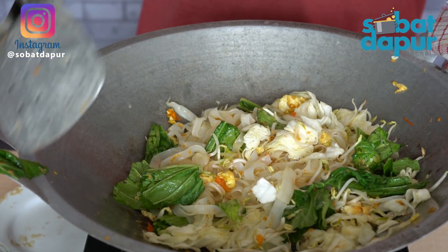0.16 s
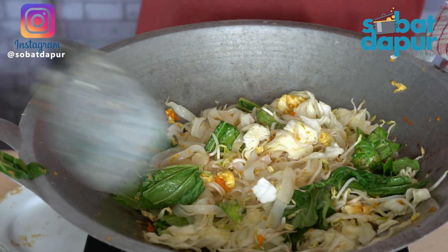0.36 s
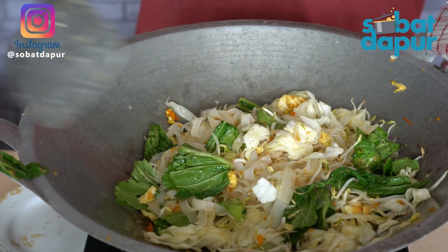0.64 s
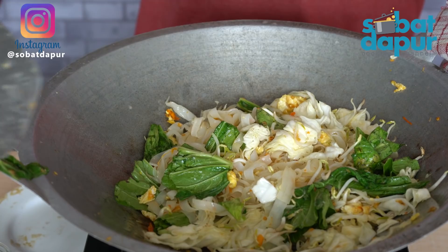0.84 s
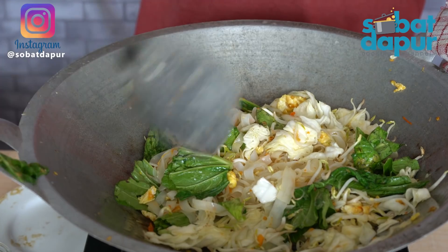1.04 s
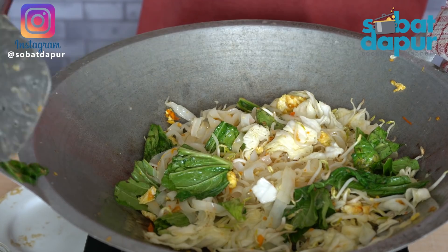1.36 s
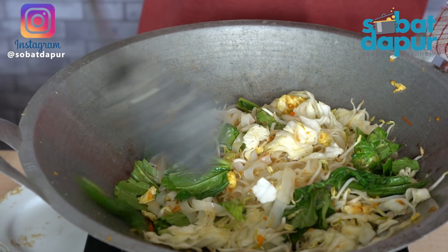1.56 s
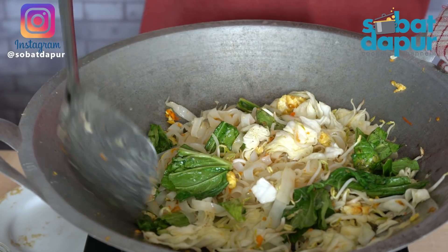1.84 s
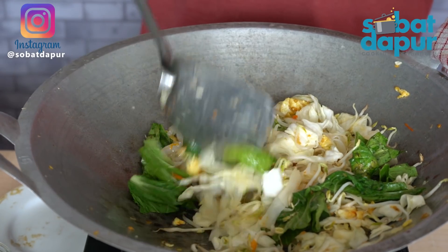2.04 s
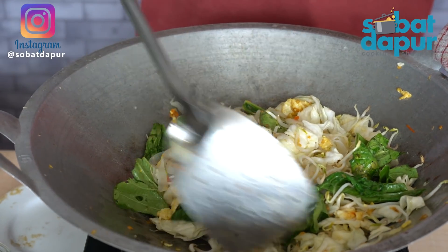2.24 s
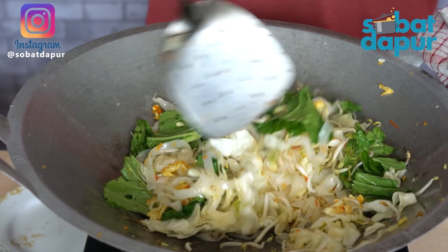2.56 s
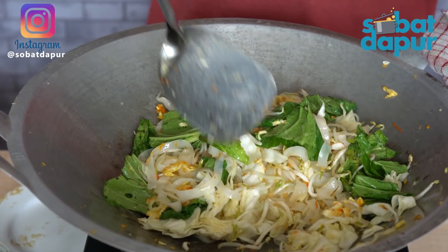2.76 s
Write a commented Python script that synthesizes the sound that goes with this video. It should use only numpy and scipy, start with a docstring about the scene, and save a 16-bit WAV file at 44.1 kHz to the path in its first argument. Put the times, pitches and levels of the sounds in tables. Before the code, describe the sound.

A metal spatula strikes a steel wok six times, about every half second, with a quick scrape before the loudest fourth clank; oil sizzles and pops over a low burner roar, close in a small kitchen.

```python
"""A metal spatula knocks six times against a steel wok and drags once along it: noise cracks, decaying
sines for thud, blade and bowl, and random slips exciting the same modes. A short ping precedes the last
blow, and food then slides off the blade as grainy noise. Oil sizzles as hiss, tiny sine bursts and single
pops over the filtered-noise roar of a gas burner. A small kitchen adds a diffuse tail to the metal and the
sliding food. The camera's gain control steps down at loud blows and creeps back."""
import sys
import numpy as np
from scipy import signal
from scipy.io import wavfile
from scipy.ndimage import uniform_filter1d

SR = 44100
rng = np.random.default_rng(int(sys.argv[2]) if len(sys.argv) > 2 else 0)


def unload_audio(sound):
    """Save the sound as a 16-bit wav file, at the path given as the first command line argument."""
    columns = np.transpose(np.atleast_2d(sound))
    # keep every value between -1 and 1, then stretch to whole-number steps
    steps = np.round(np.clip(columns, -1, 1) * 32767)
    wavfile.write(sys.argv[1], SR, steps.astype(np.int16))


N = 127890

# Spectrum of the burner roar: (frequency [Hz], relative level [dB])
FLAME_SPECTRUM = [(15, -21), (25, -48), (65, 2), (168, -4), (204, -0.5), (284, -8), (389, -8.5),
                  (425, -15.5), (509, -12.5), (557, -19.5), (900, -23), (1170, -42), (1980, -120)]
# Slow course of the roar: (time [s], level [dB])
FLAME_LEVEL = [(0, 1), (.3, 2.5), (.6, 3), (.9, 0.5), (1.3, -1), (1.7, -4), (2.1, 2.5), (2.4, -1), (2.6, 6),
               (2.9, 2.5)]
# Spectrum of the steady frying hiss: (frequency [Hz], relative level [dB])
HISS_SPECTRUM = [(290, -25.5), (500, -13.5), (562, -23.5), (960, -5), (1530, -4.5), (2070, -4.5), (3340, 4),
                 (3920, -3), (6900, -13.5), (12700, -13), (16000, -29)]
# Spectrum that filters the rain of tiny oil bursts: (frequency [Hz], relative level [dB])
CRACKLE_SPECTRUM = [(410, -50), (700, -17), (997, -15), (1540, -5), (2130, -7), (3320, 0.5), (4050, -6.5),
                    (6830, -6.5), (12800, -11), (16000, -8.5)]
# Level of hiss and crackle together: (time [s], level [dB])
FRYING_LEVEL = [(0, -2.5), (.3, 0), (.6, 0.5), (.85, 1), (1.1, -1), (1.4, -1), (1.7, -10.5), (2, -3.5),
                (2.3, -4), (2.6, -1.5), (2.9, -2.5)]
# Loudest pops of oil, each with a short ring after: (time [s], snap level [dB], ring level [dB])
POPS = [(0.082, -22, -31), (0.0882, -20.0, -39), (0.1365, -23, -41), (0.1437, -16, -22), (0.1508, -15, -24),
        (0.2243, -17, -30), (0.2348, -10.0, -30), (0.2477, -5.5, -19), (0.2525, -16.0, -20.5),
        (0.297, -18, -33), (0.3146, -11.5, -26), (0.4039, -18.0, -14.5), (0.413, -19.5, -34.5),
        (0.4155, -21, -27.5), (0.638, -18, -38), (0.6791, -23, -31), (0.699, -17, -37),
        (0.7868, -16.5, -19.5), (0.8996, -13, -26.5), (1.0235, -51, -10), (1.2369, -13.5, -19),
        (1.2558, -21, -28), (1.276, -36, -32.0), (1.2777, -18, -33), (1.3095, -17.5, -21),
        (1.3134, -15.5, -16.5), (1.3763, -14, -28), (2.143, -38, -16), (2.4783, -21.5, -17),
        (2.5438, -27, -19), (2.5647, -31, -17.5), (2.6361, -19.5, -23), (2.7688, -21, -18.5),
        (2.7832, -26, -25.5), (2.7863, -18, -25), (2.7933, -35, -12)]
# Reverberation of the kitchen: (frequency [Hz], decay time T60 [s])
ROOM_T60 = [(200, 0.43), (1000, 0.62), (3000, 0.67), (6000, 0.63), (12000, 0.36)]
# Spectrum of the sliding food: (frequency [Hz], relative level [dB])
SHOVE_SPECTRUM = [(150, -25), (300, -3), (500, 5), (700, -4), (1000, -10), (1400, -25), (4000, -38)]
# Long modes of the wok: (frequency [Hz], decay time T60 [s])
WOK_MODES = [(350, 0.43), (463, 0.5), (618, 0.54), (721, 0.48), (829, 0.58), (958, 0.69), (1330, 0.61),
             (1593, 0.42), (1755, 0.63), (2137, 0.6), (2279, 0.48), (2522, 0.5), (2923, 0.48), (3262, 0.72),
             (3418, 0.38), (3612, 0.55), (4760, 0.4)]
# Each blow lands on another spot and stirs the modes differently: one row a blow, one level [dB] a wok mode
STIRRED_DB = [(-24, -25, -38, -25, -27, -26, -23, -31, -23, -42, -27, -33, -31, -36, -29, -36, -40),
              (-32, -23, -36, -25, -34, -26, -35, -32, -24, -43, -31, -29, -25, -42, -34, -43, -48),
              (-26, -27, -44, -27, -44, -30, -31, -33, -32, -30, -21, -26, -22, -28, -32, -32, -46),
              (-30, -24, -33, -25, -20, -25, -17, -32, -21, -23, -13, -20, -20, -27, -31, -30, -48),
              (-32, -40, -37, -29, -38, -29, -22, -41, -28, -33, -31, -46, -42, -36, -29, -28, -34),
              (-28, -37, -28, -33, -36, -30, -50, -50, -48, -44, -47, -46, -42, -36, -43, -44, -45)]
# Short modes of the spatula blade: (frequency [Hz], relative level [dB], decay time T60 [s])
BLADE_MODES = [(1156, -18, 0.12), (2055, -3, 0.023), (2725, -1, 0.059), (2855, 0.5, 0.035),
               (3343, -2.5, 0.04), (3680, -9, 0.066), (3970, -14, .06)]
# Blows: (time [s], level of the knock [dB], one colour [dB] for each of COLOUR_HZ,
#         spatula ring [dB], level change per rebound [dB], rebound gap [s])
BLOWS = [(.444, -1.5, 1.5, 4.5, 2, -1, 6, -5, -17.5, -10, -3.5, 0.0059),
         (.937, -1, 0, 2.5, 2.5, 2.5, 2.2, -4, -12, -7, -10.5, 0.0042),
         (1.431, 3, -2, 2.5, 4.5, 6.5, 5.3, -5, -21, -5.5, -9.5, 0.013),
         (1.571, 7.5, -4, 6.5, 6, 7, 7.9, -9, -24, -11, -16, .005),
         (1.961, -3, -3.5, 7, -6.5, -0.5, 13.5, -3, -9, -11, -5.5, 0.0077),
         (2.403, 4, 1.5, 6, -11, -7.5, 5.6, -14, -24.5, -16.5, -10.5, .010)]
# Frequencies at which the colour of a blow is given: [Hz]
COLOUR_HZ = [400, 900, 1900, 2800, 3600, 6000, 11000]
# Decay of the thud, one a blow; food under the blade damps the later ones: (decay time T60 [s])
THUD_T60S = [0.03, .035, 0.026, 0.023, 0.018, 0.015]

# Levels are in dB, decay times T60 in s
FLAME_DB = -38.5
HISS_DB = -39.5
CRACKLE_DB, CRACKLES_PER_S, SPREAD_DB = -37.5, 1700, 4
SNAP_HZ, SNAP_T60, KNOCK_HZ, KNOCK_T60 = 11500, 0.00093, 3250, 0.0055
ROOM_DB, RING_ROOM_DB = -11, -5.5
SHOVE_S, SHOVE_DB, SHOVE_T60, GRIT_PER_S = 2.41, -31.5, 0.6, 400
PING_S, PING_HZ, PING_DB, PING_T60 = 2.376, 1600, -27.5, 0.1
TWIN_SPLIT, TWIN_DB = 0.0048, -9  # split is a fraction of the mode frequency
DRAG_FROM_S, DRAG_TO_S, SLIPS_PER_S = 1.515, 1.568, 2500
DRAG_DB, DRAG_RISE_DB, DRAG_HISS_DB, DRAG_WOK_DB = -17, 11, -6, -9.5
TOUCHES = 4  # first contact and three rebounds
CRACK_T60, THUD_HZ, THUD_DB = 0.027, 417, -1
START_GAIN_DB, LOUD_DB, QUIET_DB = 1.5, -15, -40
FALL_PER_S, CREEP_PER_S = 59, 0.86  # dB per second for each dB beyond the threshold
CEILING, EDGE_HZ = 0.94, 15900  # clipping amplitude, upper band limit


def amp(db):
    """Decibel law: 20 dB is a factor of ten in amplitude."""
    return 10 ** (np.asarray(db) / 20)


def evened(x):
    """Normalisation to unit root-mean-square value."""
    return x / np.sqrt(np.mean(x ** 2) + 1e-20)


def curve(points):
    """Linear interpolation of a table over time."""
    t, value = np.transpose(points)
    return np.interp(np.arange(N) / SR, t, value)


def colour(x, points):
    """Minimum-phase filtering: the Hilbert transform of the log gain gives the causal phase."""
    f, db = np.transpose(points)
    hz = np.abs(np.fft.fftfreq(4096, 1 / SR))
    log_gain = np.interp(np.log(hz + 1), np.log(f), db) * np.log(10) / 20
    response = np.exp(np.conj(signal.hilbert(log_gain)))
    taps = np.fft.ifft(response).real[:2048]
    return signal.oaconvolve(x, taps)[:len(x)]


def add(mix, s, sound):
    """Superposition: a sound is summed into the mix from time s."""
    part = mix[round(s * SR):][:len(sound)]
    part += sound[:len(part)]


def ring(modes, t):
    """Modal synthesis: exponentially decaying sines of random phase."""
    total = 0
    for hz, db, t60 in modes:
        total = total + amp(db - 60 * t / t60) * np.sin(2 * np.pi * (hz * t + rng.random()))
    return total


def slow(rate_hz):
    """Low-passed noise: a slow random wander of rms 1."""
    low_pass = signal.butter(2, rate_hz, fs=SR, output="sos")
    return evened(signal.sosfilt(low_pass, rng.standard_normal(N)))


def kitchen(x):
    """Diffuse reverberation: convolution with noise whose bands each decay at their own rate."""
    hz, t, bands = signal.stft(rng.standard_normal(SR), SR, nperseg=256)
    f, t60 = np.transpose(ROOM_T60)
    decay = amp(-60 * t / np.interp(hz, f, t60)[:, None])
    tail = signal.istft(bands * decay, SR, nperseg=256)[1]
    tail = tail * (np.arange(len(tail)) > 300)  # silent for the first 7 ms
    return signal.fftconvolve(x, tail / np.linalg.norm(tail))[:N]


def flame():
    """Broadband combustion roar: low filtered noise with a fluttering level."""
    level_db = FLAME_DB + curve(FLAME_LEVEL) + 1.2 * slow(40)
    return evened(colour(rng.standard_normal(N), FLAME_SPECTRUM)) * amp(level_db)


def crackle():
    """Shot noise: a random rain of tiny decaying sines of varied pitch and size."""
    happens = rng.random(N) < CRACKLES_PER_S / SR * amp(2.0 * slow(12))
    size = amp(SPREAD_DB * np.minimum(rng.exponential(1, N), 4)) * happens
    kind = rng.integers(0, 16, N)
    t, grains = np.arange(300) / SR, 0
    for k, hz in enumerate(np.geomspace(2000, 15500, num=16)):
        t60 = 0.00066 + 2.7 / hz  # higher bursts die sooner
        grain = amp(-60 * t / t60) * np.sin(2 * np.pi * (hz * t + rng.random()))
        grain = grain / np.linalg.norm(grain) * hz ** 0.3
        grains = grains + signal.oaconvolve(size * (kind == k), grain)[:N]
    return amp(CRACKLE_DB) * evened(colour(grains, CRACKLE_SPECTRUM))


def sizzle():
    """Superposed frying noise: wavering hiss, crackle, and pops of a high snap, each followed by a short ring
    near 3.3 kHz."""
    hiss = evened(colour(rng.standard_normal(N), HISS_SPECTRUM)) * amp(HISS_DB + 3.1 * slow(26))
    out = amp(curve(FRYING_LEVEL)) * (hiss + crackle())
    t = np.arange(300) / SR
    for s, snap_db, knock_db in POPS:
        a, b = rng.uniform(0.9, 1.1, 2)  # pitch scatter
        add(out, s, ring([(a * SNAP_HZ, snap_db, SNAP_T60), (b * KNOCK_HZ, knock_db, KNOCK_T60)], t))
    return out


def shove():
    """Granular friction: food slides off the blade after the last blow, a dull rustle that fades."""
    t, out = np.arange(SR) / SR, np.zeros(N)
    grit = rng.standard_normal(SR) * (rng.random(SR) < GRIT_PER_S / SR)
    rustle = evened(colour(grit, SHOVE_SPECTRUM))
    add(out, SHOVE_S, amp(SHOVE_DB - 60 * t / SHOVE_T60) * rustle)
    return out


def ping():
    """Single-mode decay: one short ping with a soft onset just before the last blow."""
    t, out = np.arange(SR // 6) / SR, np.zeros(N)
    tone = ring([(PING_HZ, PING_DB, PING_T60)], t)
    add(out, PING_S, np.minimum(t / 0.0025, 1) * tone)
    return out


def wok(levels_db, t):
    """Mode splitting: each mode of the round bowl has a weaker twin a little higher, so it beats."""
    modes = [(hz, db, t60) for (hz, t60), db in zip(WOK_MODES, levels_db)]
    twins = [(hz * (1 + TWIN_SPLIT), db + TWIN_DB, t60) for hz, db, t60 in modes]
    return ring(modes + twins, t)


def drag():
    """Stick-slip excitation: the blade edge stutters along the wok with growing pressure."""
    t = np.arange(DRAG_FROM_S, DRAG_TO_S, 1 / SR)
    slips = rng.standard_normal(len(t)) * (rng.random(len(t)) < SLIPS_PER_S / SR)
    slips = slips * amp(DRAG_RISE_DB * ((t - DRAG_TO_S) / (DRAG_TO_S - DRAG_FROM_S)))
    u = np.arange(SR // 2) / SR
    # the wok answers with the third blow's mode balance, its strongest mode set to DRAG_WOK_DB
    wok_db = np.add(STIRRED_DB[2], DRAG_WOK_DB - np.max(STIRRED_DB[2]))
    body = signal.fftconvolve(slips, ring(BLADE_MODES, u) + wok(wok_db, u))
    hiss = colour(slips, [(300, -5), (1500, 6), (5000, -4), (9000, -15), (15000, -18)])
    body = body / np.std(body[:len(t)])
    body[:len(t)] += amp(DRAG_HISS_DB) * evened(hiss)
    out = np.zeros(N)
    add(out, DRAG_FROM_S, amp(DRAG_DB) * body)
    return out


def blows():
    """Impact excitation: crack, thud and blade ring repeat in quick rebounds; the wok's modes ring on."""
    knocks, ringing = np.zeros((2, N))
    t = np.arange(SR * 2 // 3) / SR
    short = t[:SR // 6]
    for blow, stirred_db, thud_t60 in zip(BLOWS, STIRRED_DB, THUD_T60S):
        s, db, *shade_db, blade_db, rebound_db, gap = blow
        knock = np.zeros(len(t))
        thud = -amp(THUD_DB - 60 * short / thud_t60) * np.sin(2 * np.pi * THUD_HZ * short)
        for k in range(TOUCHES):
            crack = amp(-60 * short / CRACK_T60) * rng.standard_normal(len(short))
            blade = amp(blade_db) * ring(BLADE_MODES, short)
            add(knock, k * gap, amp(k * rebound_db) * (crack + blade + thud))
        spectrum = [(60, -30), (200, shade_db[0] - 5), *zip(COLOUR_HZ, shade_db)]
        add(knocks, s, amp(db) * colour(knock, spectrum))
        add(ringing, s, np.minimum(t / 0.0033, 1) * wok(stirred_db, t))  # 3.3 ms onset
    return knocks, ringing


def scene():
    """Linear superposition of direct sound, reverberation, frying and flame."""
    knocks, ringing = blows()
    metal = knocks + ping() + drag() + shove()
    room = amp(ROOM_DB) * kitchen(metal + amp(RING_ROOM_DB) * ringing)
    return (metal + ringing + room + sizzle() + flame())[None]


def record(dry):
    """Feedback gain control: fast fall when loud, slow creep up when quiet; then clipping and band limit."""
    step = 44  # samples between gain updates
    power = uniform_filter1d(dry[0] ** 2, size=220, origin=109)  # mean of the last 5 ms
    power_db = 10 * np.log10(abs(power)[::step] + 1e-12)
    gain_db, now = np.zeros(len(power_db)), START_GAIN_DB
    for k, db in enumerate(power_db):
        creep = CREEP_PER_S * max(QUIET_DB - db - now, 0)
        fall = FALL_PER_S * max(db + now - LOUD_DB, 0)
        now += step / SR * (creep - fall)
        gain_db[k] = now
    gain = amp(np.interp(np.arange(N), np.arange(len(gain_db)) * step, gain_db))
    out = np.clip(dry * gain, -CEILING, CEILING)
    low_pass = signal.firwin(511, EDGE_HZ, window=("kaiser", 12), fs=SR)
    return signal.oaconvolve(out, low_pass[None], "same")


dry = scene()
out = record(dry)
unload_audio(out)
```